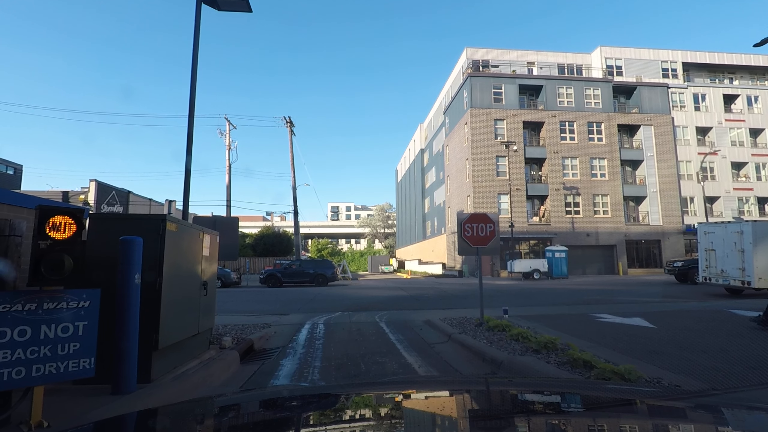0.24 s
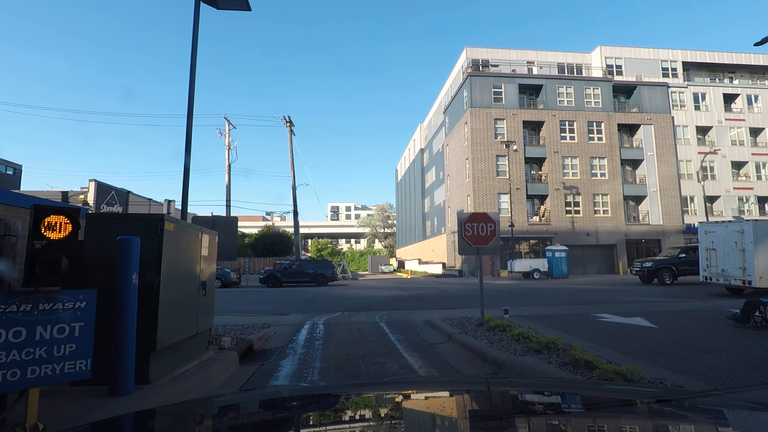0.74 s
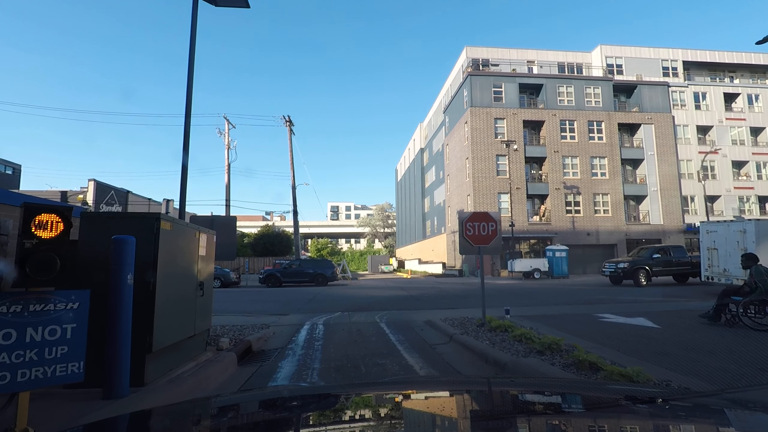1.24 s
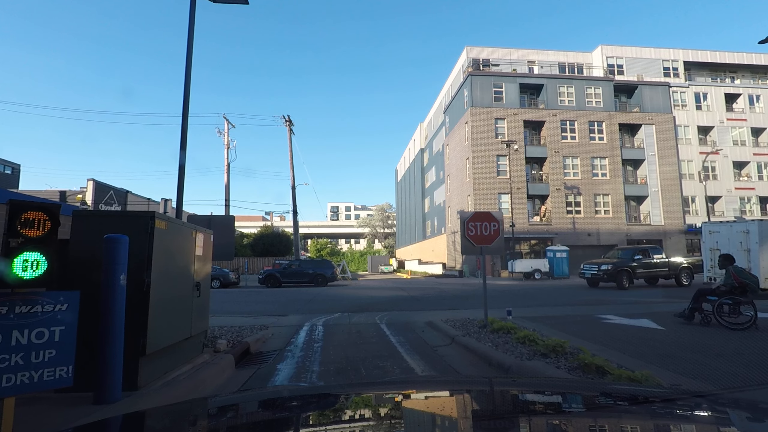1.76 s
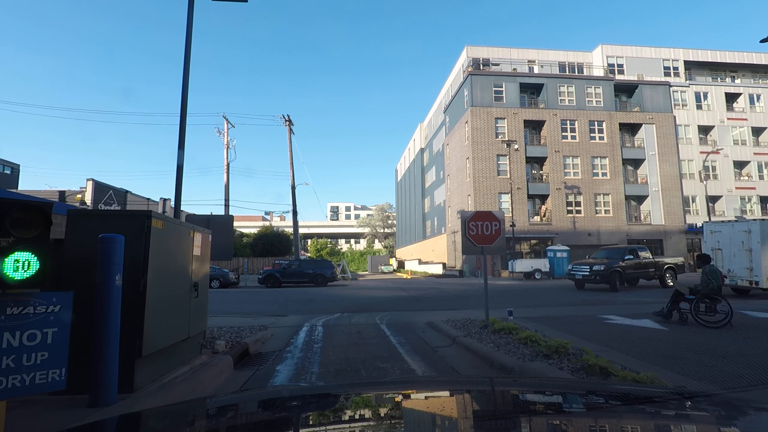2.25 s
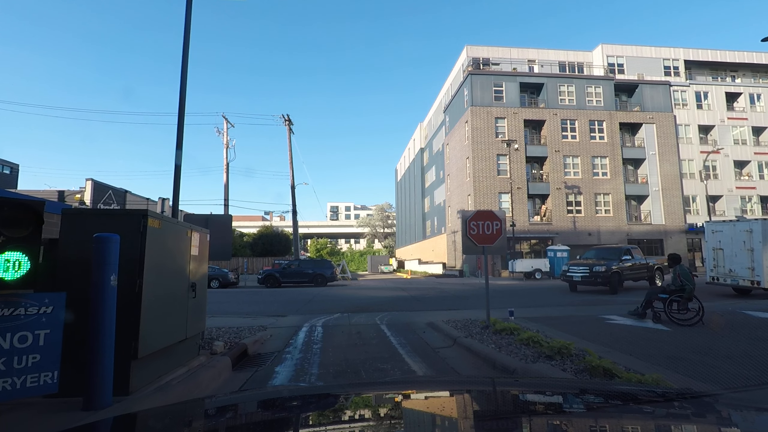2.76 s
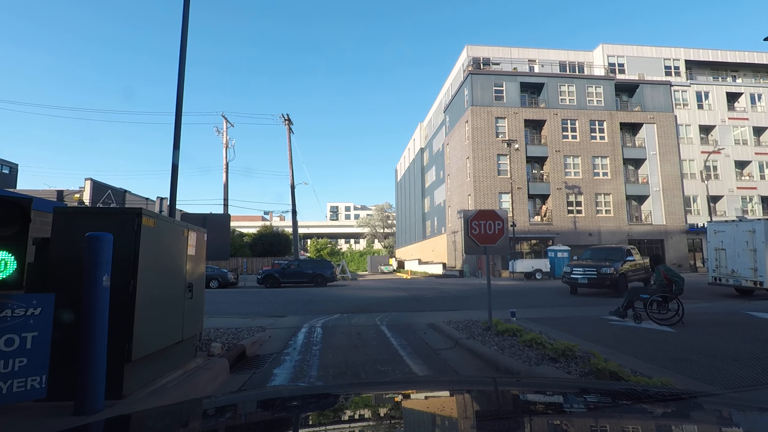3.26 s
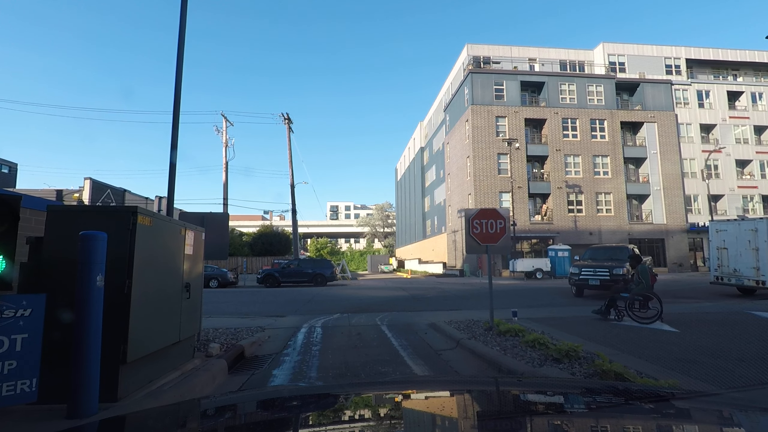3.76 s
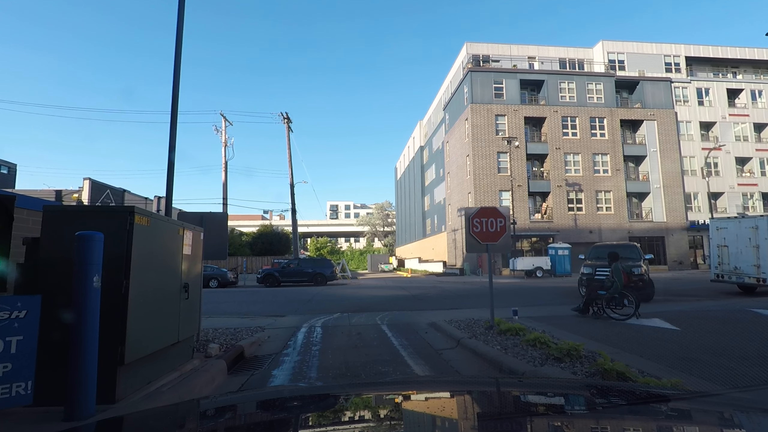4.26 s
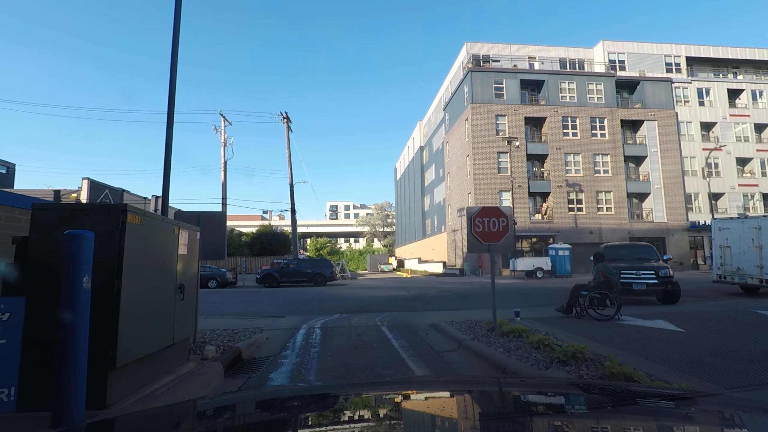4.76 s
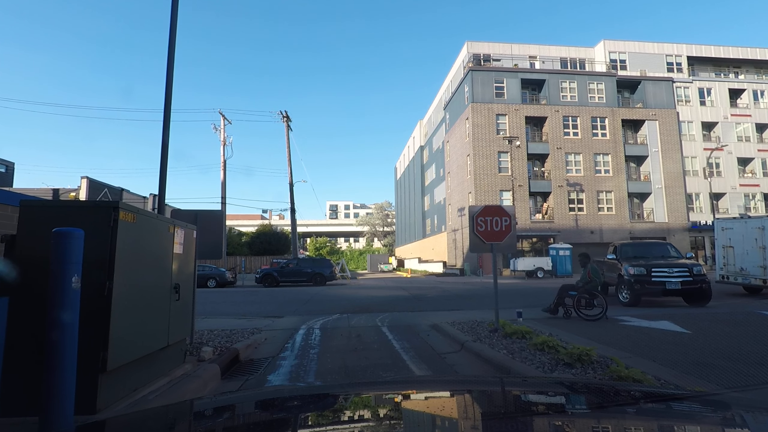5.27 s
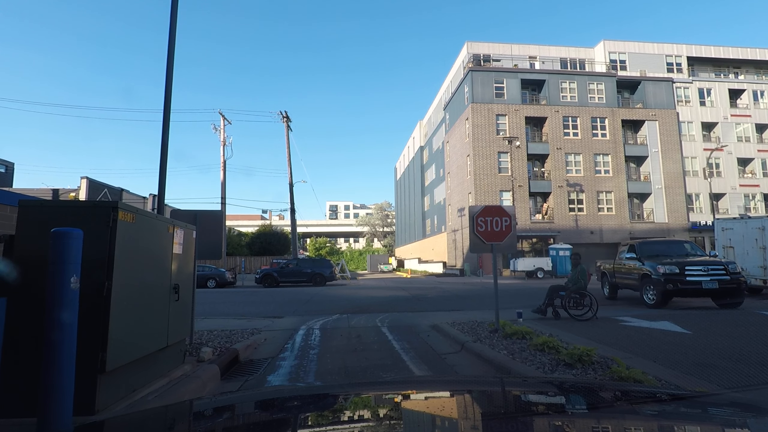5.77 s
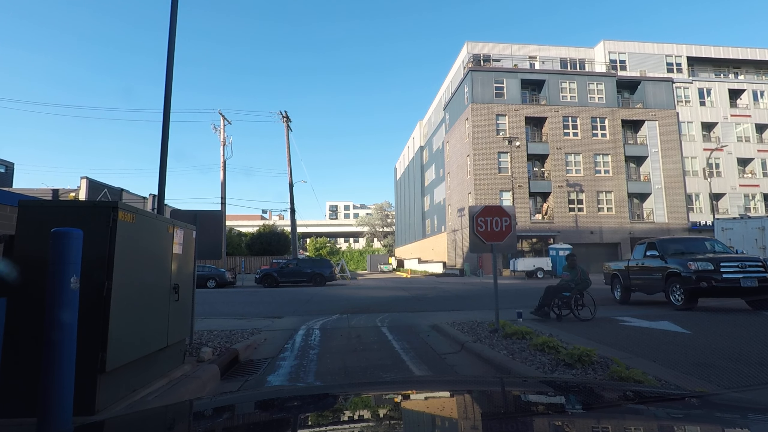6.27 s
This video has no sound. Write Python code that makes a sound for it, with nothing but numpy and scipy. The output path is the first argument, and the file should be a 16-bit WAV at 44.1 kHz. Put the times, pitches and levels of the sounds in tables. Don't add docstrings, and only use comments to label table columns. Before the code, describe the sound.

Continuous blower-dryer roar heard from a microphone behind a car's windscreen: deep buffeting, door panels droning and hollow cabin resonance, all shaken by quick irregular gusts. A fluttering fan tone swells and sinks repeatedly, over muted hiss and barely audible duct whistles. Dashboard trim rattles briefly after four seconds. As the car creeps off, the bass fades and the boom loses its ring.

```python
import sys
import numpy as np
from scipy import signal
from scipy.fft import rfft, irfft, next_fast_len
from scipy.io import wavfile
from scipy.ndimage import uniform_filter1d

SR = 44100
rng = np.random.default_rng(int(sys.argv[2]) if len(sys.argv) > 2 else 0)


def wrap_up_sound(samples):
    columns = np.atleast_2d(samples).T
    tamed = np.clip(columns, -1, 1)
    steps = np.round(tamed * 32767).astype(np.int16)
    wavfile.write(sys.argv[1], SR, steps)


def invert_db(level):
    return 10 ** (np.asarray(level, dtype=float) / 20)


N = 287077
TIME = np.arange(N) / SR

# t/s, level/dB
FANS_IN_STEP = [(0, -33.5), (.2, -26.5), (.55, -24.5), (1, -27), (1.17, -38), (1.65, -48.5), (1.85, -27),
                (2.45, -33), (2.9, -25), (3.07, -28.5), (3.2, -33), (3.75, -35), (4, -23.5), (4.25, -24.5),
                (4.45, -34), (5.55, -32), (6.15, -41.5), (6.51, -33)]


def unit_rms(x):
    return x / np.sqrt(np.mean(x ** 2) + 1e-20)


def envelope(rows):
    s, value = np.transpose(rows)
    return np.interp(TIME, s, value)


def bump(centre_s, length_s):
    return np.exp(-0.5 * ((TIME - centre_s) / length_s) ** 2)


def gusts(rows):
    gust_s = 0.036
    coarse_time = np.arange(0, N + 64, 64) / SR
    s, db = np.transpose(rows)
    bumps = np.exp(-0.5 * ((coarse_time[:, None] - s) / gust_s) ** 2)
    return np.interp(TIME, coarse_time, bumps @ db)


def drift(span_s):
    span = int(span_s * SR)
    noise = rng.standard_normal(N)
    return unit_rms(uniform_filter1d(uniform_filter1d(noise, span), span))


def turbulence(spectrum, hold_s, firm):
    f, db = np.transpose(spectrum)
    size = next_fast_len(N)
    hz = np.fft.rfftfreq(size, 1 / SR)
    shape = invert_db(np.interp(np.log(hz + 1), np.log(f + 1), db, left=-120, right=-120))
    noise = unit_rms(irfft(rfft(rng.standard_normal(size)) * shape, size)[:N])
    span = max(int(hold_s * SR), 1)
    power = uniform_filter1d(uniform_filter1d(noise ** 2, span), span)
    return unit_rms(noise / (power + 0.01) ** (firm / 2))


def resonate(x, hz, width):
    turn = np.exp(2j * np.pi * np.cumsum(hz * np.ones(len(x))) / SR)
    r = np.exp(-np.pi * width / SR)
    return 2 * (turn * signal.lfilter([1 - r], [1, -r], x / turn)).real


def whistle(hz, width):
    noise = rng.standard_normal(N)
    return unit_rms(resonate(resonate(noise, hz, width), hz, width))


def strand(hz, width, firm):
    ring = whistle(hz, width)
    power = uniform_filter1d(ring ** 2, size=2000)
    return unit_rms(ring / (power + 0.05) ** (firm / 2))


def rear_buffet():
    # f/Hz, level/dB per Hz
    buffet_spectrum = [(4, -30.5), (8, -16.5), (18, -10), (27, 1.5), (38, -0.5), (46, 6.5), (54, -8),
                       (62, -5.5), (78, -9.5), (90, -41.5)]
    # t/s, lift/dB
    rear_gusts = [(.05, 3), (.14, -1.5), (.24, 4), (.86, 7.5), (1.39, 3), (1.48, -7), (2.02, 6), (2.4, 4),
                  (3.4, -2), (3.53, 3.5), (3.8, -8), (4.38, 5), (5.08, -5), (6.24, 6), (6.38, 5)]
    level_db = -20.5 - 1.5 * TIME + gusts(rear_gusts)
    rumble = turbulence(buffet_spectrum, hold_s=0.043, firm=0.6)
    return invert_db(level_db) * (rumble + 0.28 * strand(hz=45.0, width=6, firm=0.6))


def door_panels():
    # f/Hz, level/dB per Hz
    panel_spectrum = [(62, -31.5), (78, -8), (95, -4.5), (110, -2.5), (120, 0.5), (132, 0), (145, -2.5),
                      (170, -1.5), (195, -1), (215, -23.5)]
    # t/s, lift/dB
    door_gusts = [(.09, 5), (.98, 4), (1.09, -4), (1.59, 2), (2.08, -2), (2.3, 3.5), (2.66, 4.5),
                  (3.05, -1.5), (3.53, 1), (4.1, -3), (4.31, 3.5), (5.2, -1.5), (5.4, -2), (5.7, 3.5),
                  (6.37, 0.5), (6.51, -5.5)]
    level_db = -23 + gusts(door_gusts)
    flexing = turbulence(panel_spectrum, hold_s=0.09, firm=1.0)
    return invert_db(level_db) * (flexing + 0.25 * strand(hz=126.2, width=10, firm=0.42))


def cabin_boom():
    # f/Hz, level/dB per Hz
    boom_spectrum = [(175, -32), (195, -10.5), (215, -1), (225, -3.5), (245, -0.5), (270, -4), (290, -3.5),
                     (310, -9.5), (350, -13.5), (380, -46.5)]
    # t/s, aim (1 = full on)
    jet_aim = [(0, 0.56), (.6, 0.62), (1.1, 0.93), (1.9, 0.61), (2.5, 0.75), (3.7, 0.65), (4.2, 0.95),
               (4.7, 0.54), (5.1, 0.67), (5.4, 0.47), (6.2, 0), (6.4, 0.03), (6.51, -.7)]
    # t/s, lift/dB
    cabin_gusts = [(.22, 2), (.45, -1), (.67, 2.5), (.87, -3.5), (.99, 2), (2.25, 0.5), (2.43, 5),
                   (2.53, -1), (4.17, 0.5), (4.84, -3), (5.08, 1.5), (5.28, -6), (5.5, 2.5), (5.9, 3)]
    aim = envelope(jet_aim)
    mode_hz = 255.34 + 2.08 * drift(0.22)
    modes = strand(mode_hz, width=6.8, firm=0.91) + 0.48 * strand(hz=290.8, width=14, firm=0.47)
    level_db = -23 + 5.5 * aim + gusts(cabin_gusts)
    return invert_db(level_db) * (turbulence(boom_spectrum, hold_s=0.1, firm=0.7) + 0.87 * aim * modes)


def roof():
    # f/Hz, level/dB per Hz
    roof_spectrum = [(335, -18), (350, -8), (380, 0.5), (440, -1.5), (470, 2.5), (520, 4), (540, -6),
                     (560, -25.5)]
    # t/s, lift/dB
    roof_gusts = [(.15, -2), (.83, 2.5), (1.07, 0.5), (1.5, -1), (1.72, 2.5), (1.85, 0), (2.12, -4.5),
                  (3.85, -1), (4.12, 2), (4.5, 2), (4.92, 4), (5.7, 0.5), (6.05, 0.5)]
    level_db = -27 - 0.21 * TIME + gusts(roof_gusts)
    return invert_db(level_db) * turbulence(roof_spectrum, hold_s=0.072, firm=0.69)


def blades():
    blade_hz, overtone_db = 531.3, -47.5
    slip, flutter, wander = drift(0.027), drift(0.034), drift(0.15)
    phase = 2 * np.pi * np.cumsum(blade_hz + 1.2 * wander) / SR + 0.45 * slip
    hum = invert_db(envelope(FANS_IN_STEP) + 1.6 * flutter) * np.sin(phase)
    overtone = invert_db(overtone_db) * np.sin(2 * phase - 0.44 * slip)
    return np.sqrt(2) * (hum + overtone)


def glass_rush():
    # f/Hz, level/dB per Hz
    glass_spectrum = [(520, -22.5), (545, 0.5), (565, -2.5), (590, 1.5), (615, -5), (650, -10),
                      (675, -18.5), (700, -34)]
    # t/s, lift/dB
    glass_gusts = [(.09, 3), (1.12, 6), (1.25, -4), (1.66, -3), (1.8, -8), (4.3, -4), (4.73, 4.5),
                   (4.98, 2), (5.35, 0.5), (5.67, 3), (6.02, -2), (6.36, 5)]
    leaves_s, leaving_s = 1.18, 0.03
    on_glass = 1 / (1 + np.exp(np.minimum((TIME - leaves_s) / leaving_s, 50)))
    hum_db = envelope(FANS_IN_STEP)
    fan_lift_db = 0.14 * (hum_db - hum_db.mean())
    level_db = -34.5 + fan_lift_db + 1 * on_glass + gusts(glass_gusts)
    return invert_db(level_db) * turbulence(glass_spectrum, hold_s=0.065, firm=0.62)


def nozzles():
    # f/Hz, level/dB per Hz
    low_spectrum = [(390, -26.5), (660, -2.5), (766, 2), (1210, -5.5), (1440, -2), (1610, -3.5),
                    (1800, -9.5), (2160, -8.5), (2430, -18), (2600, -23), (3380, -43.5), (5720, -120)]
    # f/Hz, level/dB per Hz
    high_spectrum = [(2200, -30), (2450, -6.5), (2640, 0), (2970, -3.5), (3600, -2.5), (4470, .5),
                     (5140, -6), (5830, -5.5), (6500, -11.5), (7200, -22), (7500, -27)]
    # f/Hz, level/dB per Hz
    air_spectrum = [(7000, -20.5), (7400, 1), (8100, -1.5), (8800, -0.5), (10000, -3.5), (11500, -9),
                    (12500, -10.5), (14000, -16), (15600, -22)]
    sweep_db = 1 * bump(centre_s=1, length_s=0.1)
    low = invert_db(sweep_db) * turbulence(low_spectrum, hold_s=0.089, firm=0.31)
    high = invert_db(-10) * turbulence(high_spectrum, hold_s=0.18, firm=0.28)
    air = invert_db(-63) * turbulence(air_spectrum, hold_s=0.1, firm=0.3)
    return invert_db(-29.5 - 0.2 * TIME) * unit_rms(low + high) + air


def duct_whistles():
    # f/Hz, width/Hz, level/dB
    duct_modes = [(918, 8, -53), (1412, 20, -50), (1826, 8, -56), (1797, 8, -56), (2557, 14, -59),
                  (2923, 12, -64), (4020, 40, -56)]
    return sum(invert_db(db) * whistle(hz, width) for hz, width, db in duct_modes)


def trim():
    # t/s, level/dB, t60/s, dullness/dB
    slips = [(1.7574, -70, .02, 6), (4.5406, -54.5, .09, 14), (4.551, -57, .07, 15),
             (4.565, -51.5, .07, 19), (4.578, -55.5, .08, 13), (4.865, -72, .05, 6), (5.065, -72, .05, 6),
             (5.768, -65, .1, 12), (5.795, -65, .1, 8), (6.062, -72, .06, 33), (6.47, -72, .12, 6)]
    # f/Hz, width/Hz, level/dB
    trim_modes = [(3800, 1500, -1), (5900, 2000, -6), (8400, 3400, 2.5), (12200, 900, -2),
                  (13600, 3200, -3)]
    out = np.zeros(N)
    tick_time = np.arange(6000) / SR
    for s, db, t60, dull_db in slips:
        onset = np.minimum(tick_time / 0.00092, 1)
        rattle = rng.standard_normal(len(tick_time)) * invert_db(-60 * tick_time / t60) * onset
        ring = np.zeros(len(tick_time))
        for hz, width, mode_db in trim_modes:
            mode_gain = invert_db(mode_db + dull_db * (hz < 7000))
            ring += mode_gain * resonate(resonate(rattle, hz, width), hz, width)
        part = out[round(s * SR):][:len(tick_time)]
        part += invert_db(db) * 3 * ring[:len(part)]
    return out


def scene():
    shell = rear_buffet() + door_panels() + cabin_boom() + roof()
    dryers = blades() + glass_rush() + nozzles() + duct_whistles()
    return (shell + dryers + trim())[None]


def roll_off(x):
    return signal.sosfilt(signal.butter(12, 15150, fs=SR, output="sos"), x)


def record(dry):
    opening = np.minimum((np.arange(N) + 4) / 16, 1)
    return roll_off(dry * opening)


dry = scene()
out = record(dry)
wrap_up_sound(out)
```